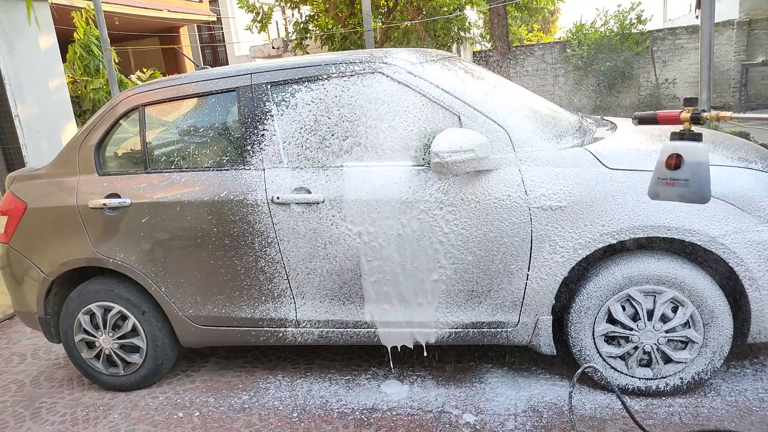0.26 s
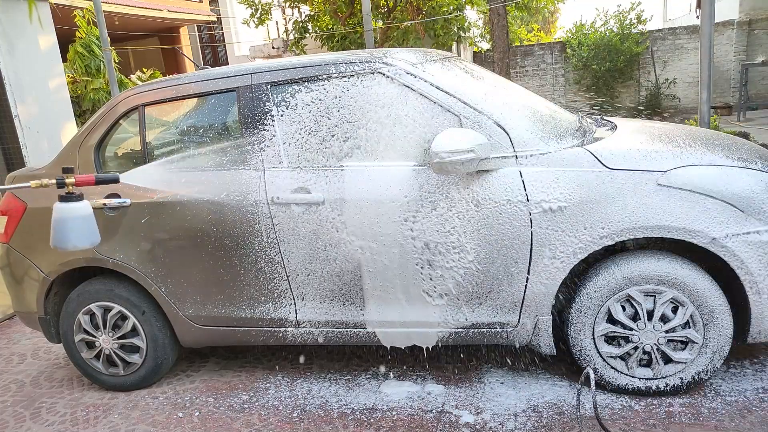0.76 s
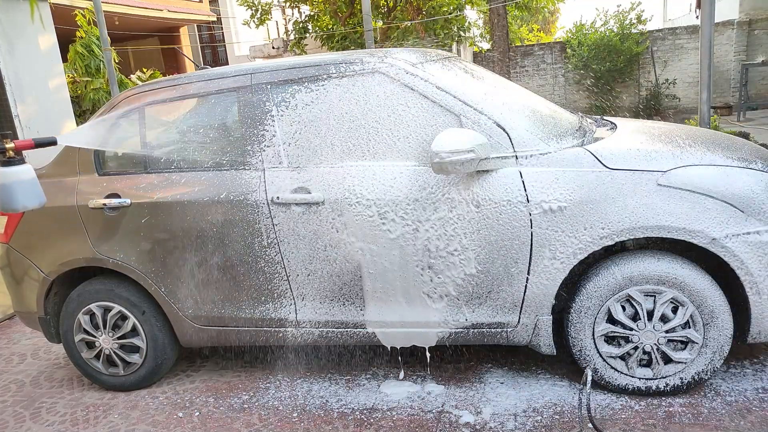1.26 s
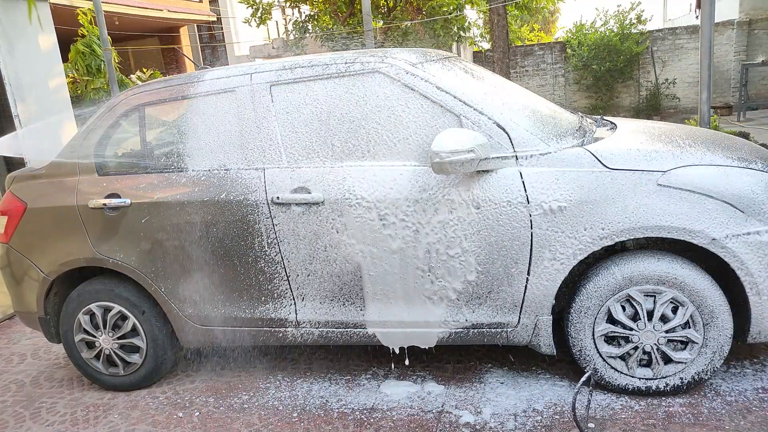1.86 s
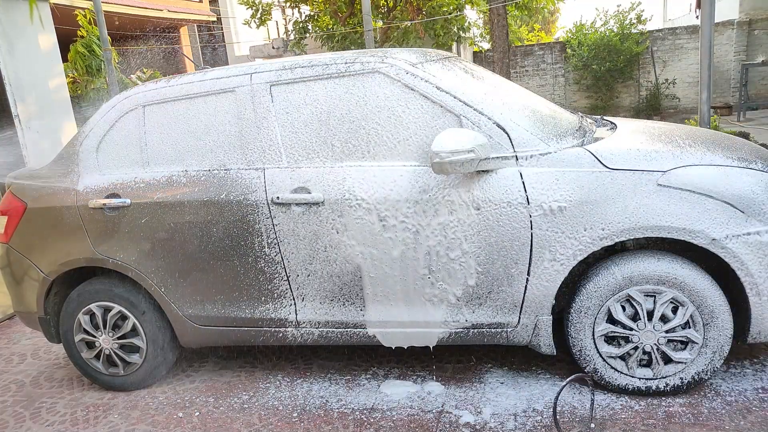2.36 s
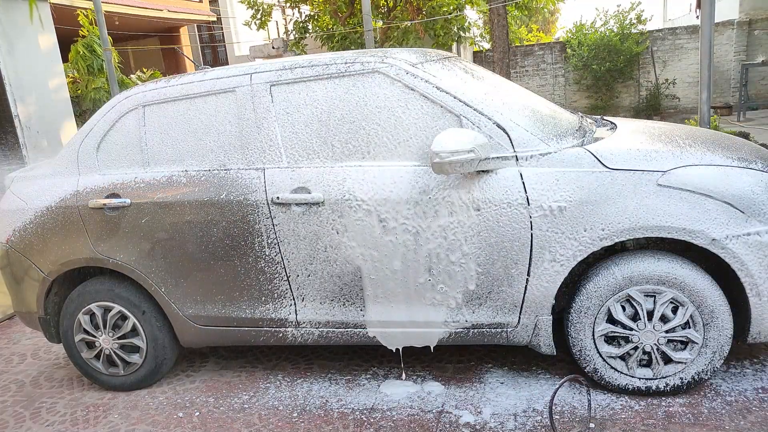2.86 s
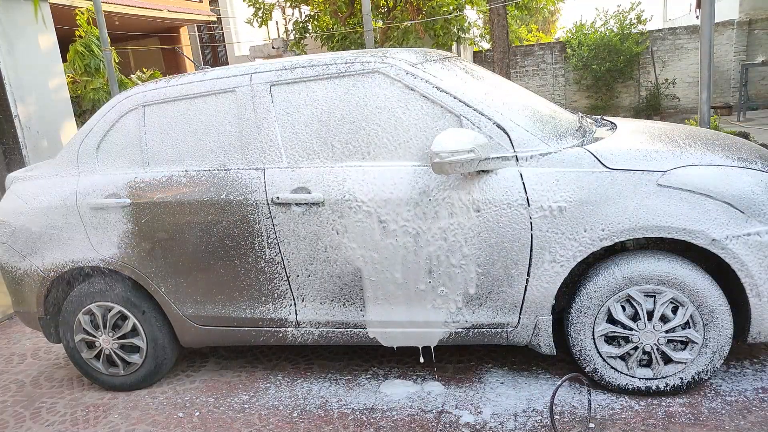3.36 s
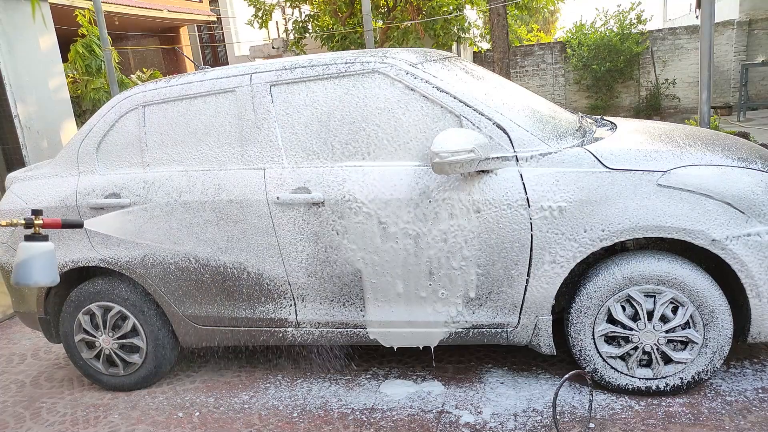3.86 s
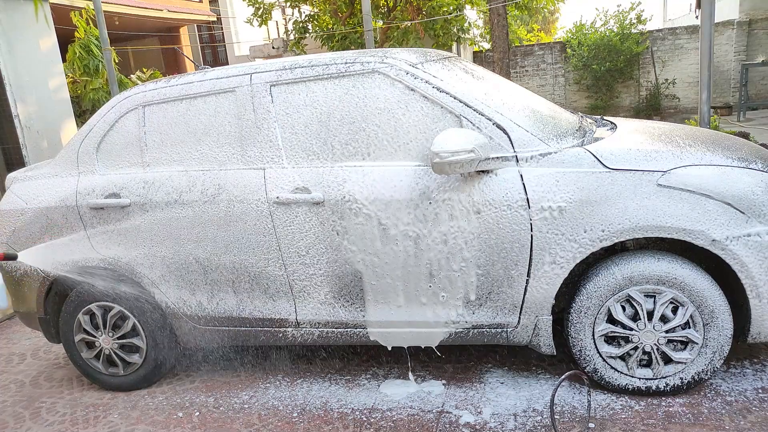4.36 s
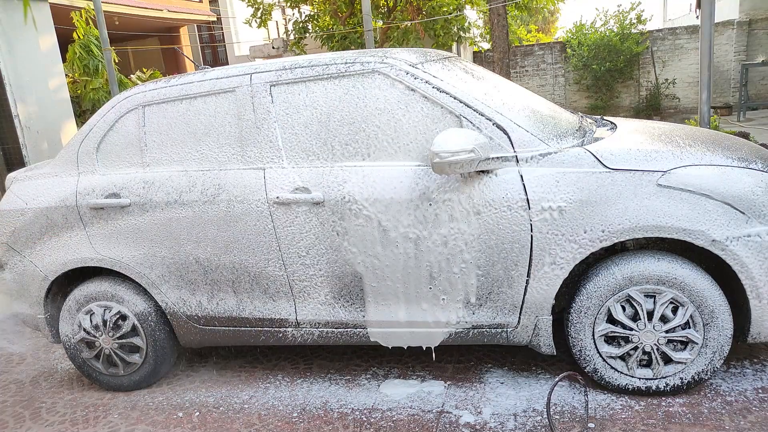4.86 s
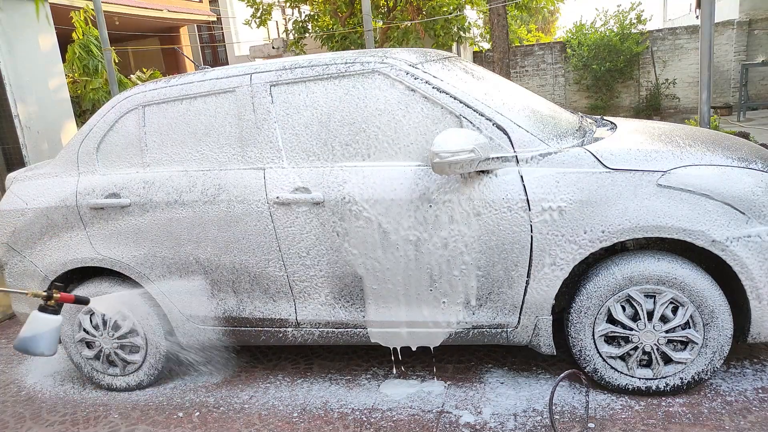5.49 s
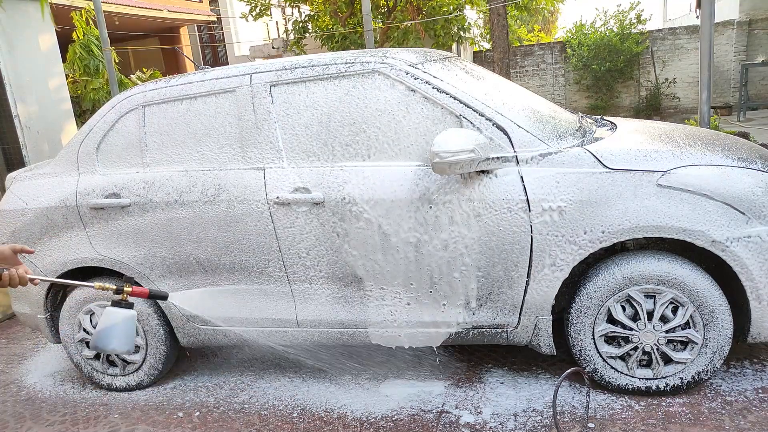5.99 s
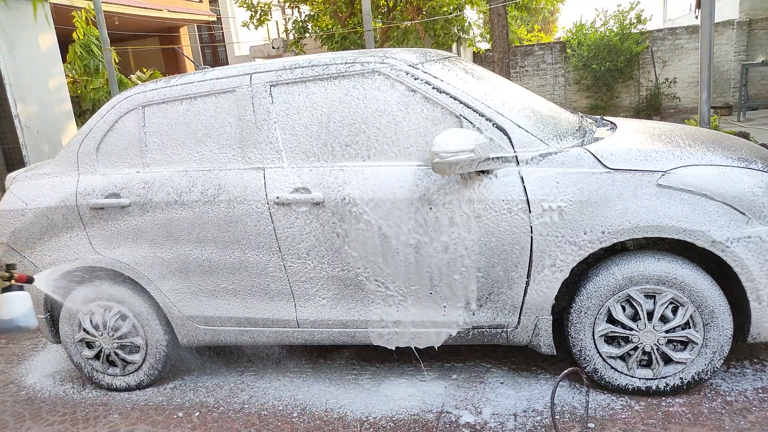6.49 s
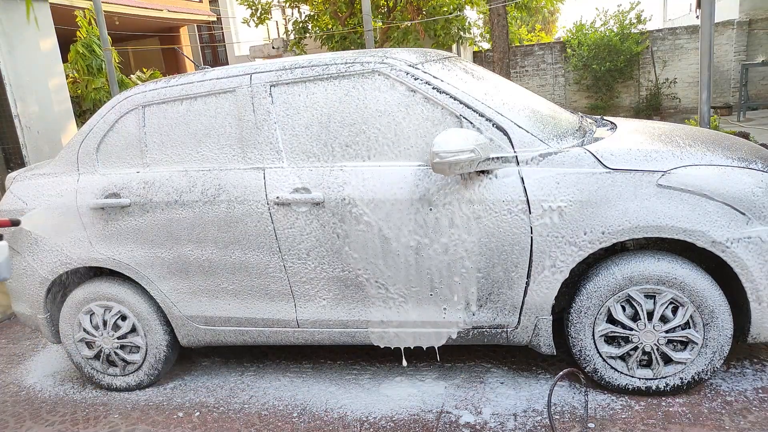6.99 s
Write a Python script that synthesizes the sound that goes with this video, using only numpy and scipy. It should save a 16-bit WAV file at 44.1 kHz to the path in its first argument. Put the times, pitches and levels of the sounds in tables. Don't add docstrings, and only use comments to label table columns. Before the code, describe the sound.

Outdoors in a yard, a pressure washer lance sprays foam along a car. The hiss starts, collapses almost at once as the trigger is released, valve knocks sound, and the jet snaps back within a third of a second. It then rushes continuously, fluttering and swelling as it strikes panels, with a faint whistle, brief sputters and a sharp spit around the middle. The pump hums and rattles behind, picked up by one mono microphone.

```python
import sys
import numpy as np
from scipy import signal
from scipy.fft import rfft, irfft, next_fast_len
from scipy.io import wavfile
from scipy.ndimage import uniform_filter1d, map_coordinates

SR = 44100
rng = np.random.default_rng(int(sys.argv[2]) if len(sys.argv) > 2 else 0)


def int16_out(signal):
    q = np.round(np.clip(np.atleast_2d(signal).T, -1, 1) * 32767)
    wavfile.write(sys.argv[1], SR, q.astype(np.int16))


def voltage_ratio(decibels):
    exponent = np.asarray(decibels, float) / 20
    return 10 ** exponent


N = 318843
TIME = np.arange(N) / SR
RELEASE_S, PULL_S = 0.084, 0.339

# [start_s, jet_towards_microphone_db, nozzle_nearness_db]
LANCE_PATH = [(0, -20, 4), (.3, -23.5, -3.5), (.68, -24.5, 3.5), (.97, -23, 3.5), (1.15, -18.5, 0.5),
              (2.1, -16, 0), (2.7, -18.5, -2.5), (2.9, -22, -2.5), (3.3, -17, -2), (3.6, -19.5, 0.5),
              (4.1, -15.5, 3), (4.58, -17, -1), (5, -23, -1), (5.3, -19, -1.5), (5.65, -19, 4),
              (6.0, -23, 3), (6.65, -22.5, -0.5), (7.23, -16, 1.5)]
# [middle_s, length_s, jet_db, extra_rasp_db]
SURGES = [(.05, 0.047, 0, 8.5), (.152, 0.014, 2.5, 4), (.345, 0.011, 4, 5), (.42, 0.079, 0, 6),
          (.85, 0.0601, 2, -3.5), (1.12, 0.08, 0, 2.5), (1.45, 0.15, 1, -1), (1.82, 0.1508, 1.5, -3),
          (2.98, 0.076, 0.5, 4), (3.2, 0.17, 0, 1.5), (3.54, 0.072, 1.1, 5), (3.76, 0.18, 0, 3),
          (4.0, 0.057, 1, 0), (4.13, 0.092, 0, 1), (4.22, .1, -0.5, 1), (4.37, 0.19, 0.5, 1),
          (4.6, 0.032, 1, 0), (4.9, 0.19, -0.5, 2), (5.06, 0.02, 1, 3), (5.2, 0.066, 2.5, 2),
          (5.39, 0.05, 1.5, -0.5), (5.78, .06, -1, 5), (6.04, 0.056, 1, 0), (6.13, 0.055, 0, 1.5),
          (6.23, 0.04, 0.5, 4.5), (6.43, 0.065, 1, 2.5), (6.3, .11, 6, 1.5), (6.55, .1, 2.5, 2),
          (6.8, 0.23, 0.5, 4), (7.05, 0.12, -0.5, 3.5)]
# [middle_s, level_db]
SPUTTERS = [(0.632, 5), (0.851, 3), (1.105, 1), (1.262, 0), (1.818, 3.5), (1.922, 2.5), (1.989, 2.5),
            (2.634, 2), (2.814, 4), (3.532, 2.5), (3.929, 3), (3.997, 3), (4.501, 0.5), (4.585, 4),
            (5.046, 4.5), (5.362, 6.5), (5.543, 4.5), (5.657, 5), (6.017, 4.5), (6.297, 1.5), (6.352, 4),
            (7.206, 3.0)]


def lance():
    facing_db, near_db = curves(LANCE_PATH)
    surge_db, strike_db = bumps(SURGES)
    fizz_db = facing_db + surge_db
    swing_db = fizz_db + 19
    sputter_db, = bumps([(s, 0.0047, 1.22 * db) for s, db in SPUTTERS])
    flutter_db = sputter_db + 0.3 * wobble(8.2) + 0.4 * wobble(30) + 0.61 * wobble(350)
    flow = voltage_ratio(trigger(sag_db=1, fall_db_per_s=133, start_db=-18, build_s=0.036))
    singing = flow * whistle(near_db, flutter_db)
    hiss = fizz(fizz_db, flutter_db) + rasp(swing_db, strike_db, near_db, flutter_db)
    hiss = hiss + spray(swing_db, near_db, flutter_db)
    heard = surroundings(flow * hiss + 0.64 * singing, direct=0.5 * singing)
    return heard + flow * panel() + spits()


# [pitch_hz, level_db_per_hz]
FIZZ_COLOUR = [(3120, -41), (5300, -10), (6280, 2), (6890, 0.5), (7670, -7), (7870, -17), (8400, -31.5),
               (10900, -61.5), (18500, -120)]


def fizz(fizz_db, flutter_db):
    noise = rush(FIZZ_COLOUR, patchy_db=1.05)
    top = filtered(noise, lambda hz: 1 / (1 + (7300 / (hz + 1)) ** 24))
    dulling = np.clip(0.14 * (-18.5 - fizz_db), 0, 0.45)
    return voltage_ratio(fizz_db - 0.72 + flutter_db) * (noise - dulling * top)


def rasp(swing_db, strike_db, near_db, flutter_db):
    level_db = -25 + 0.63 * swing_db + strike_db + 0.55 * wobble(7)
    level_db = level_db + trigger(sag_db=1.8, fall_db_per_s=5, start_db=3.4, build_s=0.03)
    pitch_hz = 4578 + 10 * swing_db + 44.67 * wobble(6)
    broad = resonance(pitch_hz, width_hz=1880, steep=2.51)
    core = 0.32 * voltage_ratio(0.76 * near_db) * resonance(pitch_hz, width_hz=330)
    return voltage_ratio(level_db - 1.0 + flutter_db) * patchy(broad + core, patchy_db=1.43)


# [middle_s, length_s, level_db, pitch_shift_hz]
FLARES = [(.065, 0.026, 3, 110), (.22, 0.051, 7, 28), (.32, 0.016, 28, 30), (.42, 0.081, 4, -59.5),
          (.94, 0.029, 3, 9.5), (2.07, 0.053, 2, 10.5), (3.54, 0.065, -0.5, -9.5), (4.02, 0.042, 1.5, -20),
          (4.17, 0.077, -0.5, -0.5), (6.72, 0.081, -1.5, -40.5), (.8, .15, -1, 30), (1.55, 0.11, 0, 0),
          (3.45, 0.095, 1.5, 30), (4.36, 0.056, 7.5, 50), (5.65, .1, 1, -39.5), (5.0, 0.082, 0, -120),
          (4.7, .1, 1, -68.5), (5.45, .1, 0.5, -80), (6.08, .08, 3, -61), (6.22, .1, 3.5, -10),
          (6.54, 0.058, 1.5, 20), (7.02, 0.081, 1, 10)]


def whistle(near_db, flutter_db):
    flare_db, shift_hz = bumps(FLARES)
    level_db = -31 + near_db + flare_db + 0.99 * wobble(10)
    level_db = level_db + trigger(sag_db=7.5, fall_db_per_s=5, start_db=-2.5, build_s=0.1)
    pitch_hz = 1848 - 12 * near_db + shift_hz + 12 * wobble(5)
    return voltage_ratio(level_db - 1.5 + 0.4 * flutter_db) * resonance(pitch_hz, width_hz=253, steep=1.55)


# [pitch_hz, level_db_per_hz]
SPRAY_COLOUR = [(900, -45), (1300, -19.5), (2200, -2.5), (2800, 1.5), (3600, 0), (5400, -1), (7500, 2.5),
                (8200, -33.5)]


def spray(swing_db, near_db, flutter_db):
    level_db = -31 + 0.47 * near_db + 0.052 * swing_db + 0.51 * wobble(7.4)
    level_db = level_db + trigger(sag_db=0, fall_db_per_s=-3, start_db=-2, build_s=0.12)
    return voltage_ratio(level_db + 3.5 + 0.42 * flutter_db) * rush(SPRAY_COLOUR, patchy_db=2.0)


# [middle_s, peak_db, pitch_hz, half_length_s]
SPITS = [
    (.3392, -30, 6000, .00012),
    (4.49956, 1.1, 6700, .00026),
]


def spits():
    out = np.zeros(N)
    for s, db, hz, half in SPITS:
        t = TIME - s
        out += voltage_ratio(db) * np.exp(-(t / half) ** 2) * np.cos(2 * np.pi * hz * t)
    return out


# [middle_s, length_s, level_db]
DRUMMING = [
    (.42, 0.046, -3),
    (.8, 0.27, 5.5),
    (3.7, .3, 1.5),
    (4.9, 0.4, -10.5),
    (5.85, 0.21, 3.5),
    (6.25, .15, 0.5),
]


def panel():
    level_db = -47 + bumps(DRUMMING)[0] + 1.2 * wobble(5.5)
    return voltage_ratio(level_db) * resonance(927 + 60 * wobble(3), width_hz=440)


# [extra_delay_s, level_db]
ECHOES = [(.0015, -10), (.0021, -16), (.0029, -13), (.0036, -23.5), (.0046, -7), (.0055, -8), (.0064, -11),
          (.0076, -7.5), (.0092, -12.5), (0.012, -18.5), (.015, -10.5)]
# [start_s, length_s, from_hz, to_hz, depth_db]
HOLLOWS = [(.17, 0.48, 3300, 2860, 4), (0.543, 0.26, 4320, 4500, 5), (2.2, 0.66, 3670, 4400, 6),
           (2.4, 0.66, 4600, 4910, 5.5), (4.7, 0.5, 3500, 3093, 4.5), (5.48, 0.21, 3700, 3700, 7.5),
           (5.66, 0.12, 3300, 2790, 8), (5.86, 0.16, 3810, 3650, 7), (5.97, 0.094, 3500, 2900, 11),
           (6.04, 0.076, 3000, 3700, 7), (6.08, 0.12, 4500, 4400, 3), (.33, .2, 1200, 1200, 6),
           (6.85, .4, 8040, 8000, 2.5), (5.75, .45, 8000, 8000, 1), (.7, .25, 3000, 3000, 2.5),
           (4.7, .1, 4200, 4190, 2.5), (.4, .18, 2900, 2900, 4), (2.72, .22, 5300, 5300, 3),
           (4.06, .22, 1800, 1800, 3), (.16, .1, 1500, 1500, 4), (5.78, .08, 3700, 3700, 2),
           (5.5, 0.43, 5000, 5200, 4.5), (6.25, 1, 5100, 5170, 2.5), (.33, 0.18, 3000, 2900, 3),
           (.33, 0.15, 6350, 6350, 4), (.335, 0.21, 1800, 1800, 4.5), (1.75, 0.57, 4030, 4300, 3.5),
           (2.8, 0.46, 3080, 3120, 1.5), (3.35, 0.27, 3400, 3420, 3), (3.95, 0.75, 2290, 2440, 5.5),
           (4.6, 0.39, 2700, 2517, 3.5), (5.1, 0.48, 5300, 5160, 2), (6.55, 0.69, 2650, 2450, 3)]
# [start_s, length_s, from_hz, to_hz, lift_db]
RIDGES = [(.36, 0.18, 4070, 4180, 5.5), (.55, 0.15, 2600, 2580, 8), (1.04, 0.11, 3746, 3780, 7),
          (2.55, 0.48, 2850, 2780, 7.5), (2.92, 0.25, 4630, 4450, 4.5), (3.15, 0.3, 3980, 3980, 7),
          (4.1, 0.37, 4500, 4960, 2), (5.5, 0.63, 4570, 4450, 3.5), (5.9, 0.43, 2630, 2580, 6),
          (6.19, 0.14, 4400, 4450, 6), (6.3, .25, 4550, 4630, 4), (6.65, 0.8, 4440, 4300, 3),
          (.34, 0.14, 7100, 7100, 9), (.35, .16, 5650, 5700, 7), (.3, 0.47, 2150, 2170, 3.5),
          (.4, 0.27, 1470, 1450, 11.5), (.5, 0.2, 4750, 4760, 4), (.78, 0.31, 4720, 4650, 3),
          (1.28, .4, 3730, 3613, 5), (1.38, 0.21, 4700, 4860, 6), (1.4, 0.22, 5770, 5750, 1),
          (1.7, 0.2, 5000, 4800, 8.5), (1.75, 0.49, 3000, 3120, 3), (2.3, 0.61, 6750, 7110, 3),
          (2.4, 0.59, 1500, 1510, 16.5), (3.1, 0.28, 1590, 1600, 13), (3.45, .2, 4900, 4900, -1),
          (3.55, 0.24, 2618, 2670, 5), (3.97, .1, 4400, 4400, 7.5), (2.75, 0.18, 2520, 2520, 9),
          (4.3, 0.37, 3800, 3740, 7.5), (4.3, 0.15, 3260, 3300, 2), (5.25, 0.3, 3700, 3620, 6),
          (5.28, 0.31, 2983, 2940, 7), (5.85, 0.35, 7060, 6900, 3), (4.45, .2, 2550, 2550, 5),
          (4.7, 0.67, 1210, 1200, 14), (5.55, 0.23, 1350, 1350, 0), (6.7, 0.33, 5600, 5600, 4.5),
          (6.2, 0.18, 6200, 6300, 1.5), (6.33, 0.42, 4700, 4620, 5), (6.68, .35, 3725, 3800, 4),
          (6.8, 0.3, 7200, 6973, 5.5),
          (.5, 0.35, 1500, 1400, 4), (.9, .15, 1850, 1830, 2), (1.15, .25, 2100, 1900, 0),
           (1.75, 0.37, 1850, 2100, 2), (3.95, 0.094, 1800, 1800, 4.5), (4.88, 0.16, 1660, 1800, 7.5),
           (6.4, 0.24, 1770, 2000, 8), (6.0, .3, 1720, 1770, -0.5), (6.45, .2, 1850, 1790, 2),
           (0.85, .2, 4600, 4600, 3.5), (1.0, 0.2, 4600, 5600, 2.5), (1.15, .2, 4250, 4250, 3),
           (5.6, .1, 4100, 3780, 8), (4.3, 0.11, 4230, 4000, 10), (5.3, 0.13, 4400, 5700, 5),
           (4.2, .25, 4700, 4900, 2), (6.98, 0.24, 4000, 4450, 2.5), (6.22, 0.23, 6200, 6350, 1.5),
           (5.98, 0.086, 4500, 4450, 6.5), (5.55, .14, 4450, 4500, 4), (5.7, .16, 4650, 4600, 4),
           (.6, .25, 1450, 1450, 4), (1.28, .25, 1450, 1450, 4), (0, .1, 1800, 1800, 3),
           (3.62, .12, 4550, 4550, 3), (4.55, .2, 4200, 4000, 3), (.2, .1, 6400, 6400, 4)]


def surroundings(jet, direct):
    stretch = 1 + 0.0397 * np.cos(2 * np.pi * (TIME - 1.1) / 1.3)
    dulled = filtered(jet, lambda hz: 1 / np.sqrt(1 + (hz / 4300) ** 4))
    heard = direct + jet
    for s, db in ECHOES:
        level_db = db - 3 + 2.5 * np.tanh(wobble(3.5))
        delay_s = s * stretch + 0.00012 * wobble(2.5)
        heard = heard + voltage_ratio(level_db) * np.interp(TIME - delay_s, TIME, dulled, left=0)
    hz, t, z = signal.stft(heard, SR, nperseg=512)
    lift_db = glides(RIDGES, 0.035, hz, t) - glides(HOLLOWS, 0.13, hz, t)
    return signal.istft(z * voltage_ratio(lift_db), SR, nperseg=512)[1][:N]


# [pitch_hz, level_db_per_hz]
CASING_COLOUR = [(20, -10.5), (120, -16), (250, -8.5), (480, -15.5), (570, -7), (660, 1.5), (950, -1.5),
                 (1300, -7.5), (2500, -9)]
# [multiple_of_shaft_speed, level_db]
SHAFT_ORDERS = [(3, -20.5), (5, -21.5), (6, -16), (8, -23.5), (9, -22), (13, -7.5), (15, -18.5), (16, -6),
                (17, 2.5), (18, -12.5), (19, -21), (20, -10.5)]


def machine():
    casing_db = -34.5 + 0.21 * wobble(2.0) + 0.22 * bumps(DRUMMING)[0]
    casing_db = casing_db + trigger(sag_db=1.5, fall_db_per_s=85, start_db=-3, build_s=0.045)
    tones_db = -42.5 - 3 * (TIME < PULL_S)
    tones_db = tones_db + trigger(sag_db=16, fall_db_per_s=45, start_db=-9, build_s=0.05)
    slip = 0.6 * np.clip(TIME - RELEASE_S, 0, PULL_S - RELEASE_S)
    slip = slip * np.exp(-np.maximum(TIME - PULL_S, 0) / 0.02)
    shaft_hz = 47.44 * (1 - slip + 0.00035 * wobble(2.987))
    turn = 2 * np.pi * np.cumsum(shaft_hz) / SR
    tones = np.zeros(N)
    for k, db in SHAFT_ORDERS:
        waver_db = (2.2 - 0.06 * db) * (wobble(9) + wobble(28))
        tones += voltage_ratio(db + waver_db) * np.sin(k * turn + rng.uniform(0, 2 * np.pi))
    throb = 1 + 0.21 * np.cos(3 * turn) + 0.086 * np.cos(turn)
    return voltage_ratio(tones_db + 4.5) * tones + voltage_ratio(casing_db - 3.5) * throb * rush(CASING_COLOUR, patchy_db=1.0)


# [start_s, peak_db, pitch_hz, time_to_fall_60_db_s]
KNOCKS = [(.005, -34.5, 696, 0.26), (.065, -31, 680, .15), (.1, -29, 796, .08), (.122, -22.5, 780, 0.04),
          (.17, -34.5, 703, 0.14), (.275, -43, 707, .12), (0.414, -30, 990, .04), (0.149, -27, 980, 0.04),
          (.196, -33, 60, .05), (.339, -24, 6500, .004), (.345, -30, 810, 0.067), (.37, -29, 645, 0.095)]


def valve():
    out = np.zeros(N)
    for s, db, hz, t60 in KNOCKS:
        t = np.maximum(TIME - s, 0)
        out += voltage_ratio(db - 60 * t / t60) * np.sin(2 * np.pi * hz * t) * (1 - np.exp(-t / 0.001))
    return out


# [middle_s, length_s, level_db]
GUSTS = [
    (.5, .3, 9),
    (1.35, 0.27, 12),
    (3.5, .2, 7.5),
    (4.5, 0.23, 10.5),
    (5.25, 0.4, 15.5),
]
# [pitch_hz, level_db]
MAINS = [
    (100.3, 2),
    (300, -5),
]
# [pitch_hz, width_hz, level_db]
DRONES = [
    (31, 9, -7),
    (71.5, 9.9, -0.5),
]


def yard():
    buffet_db = -62.5 + bumps(GUSTS)[0] + 1.2 * wobble(6)
    buffet = voltage_ratio(buffet_db) * rush([(10, -5), (22, -5), (33, 5), (45, -15), (58, -22.5)], patchy_db=-0.5)
    hum_db = -49.5 + bumps([(1.87, 0.22, 6), (2, 0.08, 4), (1.15, 0.15, 3)])[0]
    hum = sum(voltage_ratio(db + 1.3 * wobble(4.3)) * np.sin(2 * np.pi * hz * TIME) for hz, db in MAINS)
    drone = sum(voltage_ratio(db) * resonance(hz, width_hz) for hz, width_hz, db in DRONES)
    air = voltage_ratio(-49) * rush([(40, -4.5), (300, -8), (600, -11), (1100, -21), (2000, -13.5), (3400, -23.5),
                           (6400, -17), (8000, -24.5)], patchy_db=1.5)
    return buffet + voltage_ratio(hum_db - 5.5) * (hum + drone) + air


def trigger(sag_db, fall_db_per_s, start_db, build_s):
    off = np.maximum(TIME - RELEASE_S, 0)
    falling = -sag_db * (1 - np.exp(-off / 0.0087)) - fall_db_per_s * off
    building = start_db * np.exp(-np.abs(TIME - PULL_S) / build_s)
    return np.where(TIME < PULL_S, falling, building)


def bumps(rows):
    s, length, *heights = np.transpose(rows)
    coarse = TIME[::128]
    bells = np.exp(-((coarse[:, None] - s) / length) ** 2)
    return [np.interp(TIME, coarse, bells @ h) for h in heights]


def glides(rows, width, hz, t):
    total = 0
    for s, length, from_hz, to_hz, db in rows:
        u = np.clip((t - s) / length, 0, 1)
        centre_hz = from_hz + (to_hz - from_hz) * u
        shape = np.exp(-((hz[:, None] / centre_hz - 1) / width) ** 2)
        total = total + db * np.sin(np.pi * u) ** 0.6 * shape
    return total


def curves(rows):
    s, *columns = np.transpose(rows)
    return [np.interp(TIME, s, column) for column in columns]


def wobble(rate):
    coarse = TIME[::8]
    points = rng.standard_normal(int(N * rate / SR) + 4)
    return np.interp(TIME, coarse, map_coordinates(points, [coarse * rate]))


def unit(x):
    return x / np.sqrt(np.mean(np.abs(x) ** 2) + 1e-20)


def filtered(x, response):
    m = next_fast_len(N + 8192)
    return irfft(rfft(x, m) * response(np.fft.rfftfreq(m, 1 / SR)), m)[:N]


def patchy(x, patchy_db):
    z = signal.stft(x, nperseg=512)[2]
    field = uniform_filter1d(rng.standard_normal(z.shape), 5, 0)
    field = uniform_filter1d(field, 12, 1)
    return unit(signal.istft(z * voltage_ratio(patchy_db * unit(field)), nperseg=512)[1][:N])


def rush(spectrum, patchy_db):
    ends = (spectrum[0][0] / 1.1, -120), (spectrum[-1][0] * 1.05, -120)
    hz, db = np.transpose([ends[0], *spectrum, ends[1]])
    noise = filtered(rng.standard_normal(N), lambda f: voltage_ratio(np.interp(np.log(f + 1), np.log(hz + 1), db)))
    return patchy(noise, patchy_db)


def resonance(centre_hz, width_hz, steep=2):
    def sway():
        return filtered(rng.standard_normal(N), lambda f: (1 + (2 * f / width_hz) ** 2) ** (-steep / 2))
    turn = 2 * np.pi * np.cumsum(centre_hz + 0 * TIME) / SR
    return unit(sway() * np.cos(turn) + sway() * np.sin(turn))


def scene():
    return (lance() + machine() + valve() + yard())[None]


def low_pass(x):
    return signal.sosfilt(signal.butter(12, 15750, fs=SR, output="sos"), x)


def record(dry):
    hz, t, z = signal.stft(dry[0], SR, nperseg=1024)
    loud_db = 20 * np.log10(np.linalg.norm(z, axis=0) + 0.003) + 19
    jumps = np.repeat(rng.standard_normal(len(t)), 2)[:len(t)]
    edge_hz = 8387 + 8.5 * loud_db + 70 * jumps
    edge_hz += 2600 * (np.abs(t - PULL_S) < 0.007)
    kept = signal.istft(z * (hz[:, None] < edge_hz), SR, nperseg=1024)[1][:N]
    hiss = voltage_ratio(-88) * rush([(8600, -30), (11500, -22), (13500, 0), (15600, 0)], patchy_db=3)
    clipped = np.clip(kept + hiss, -1.04, 0.93)
    return low_pass(clipped[None])


dry = scene()
out = record(dry)
int16_out(out)
```